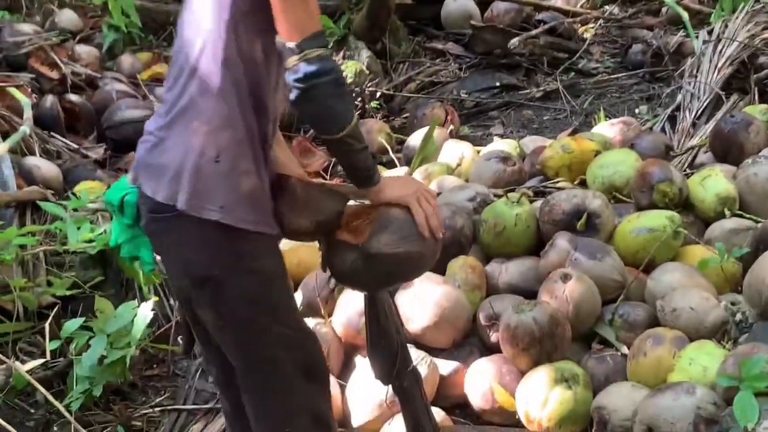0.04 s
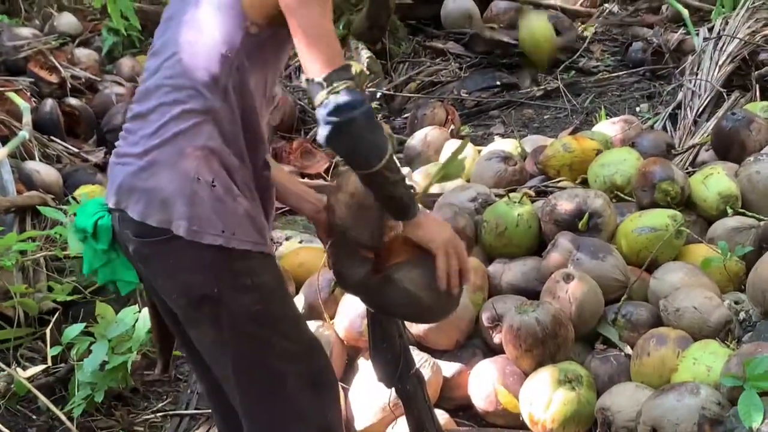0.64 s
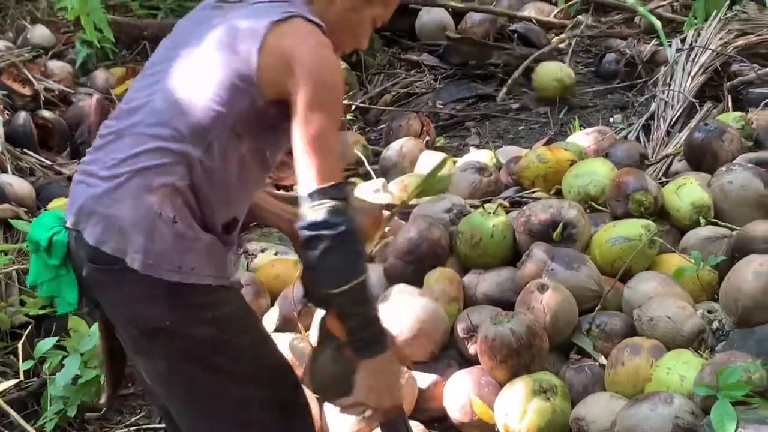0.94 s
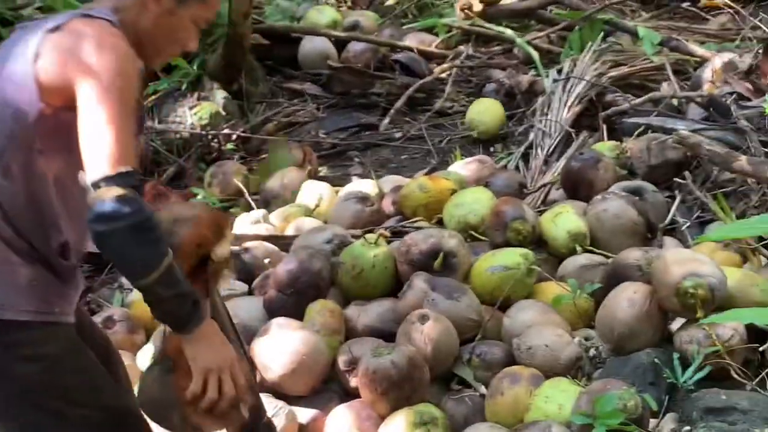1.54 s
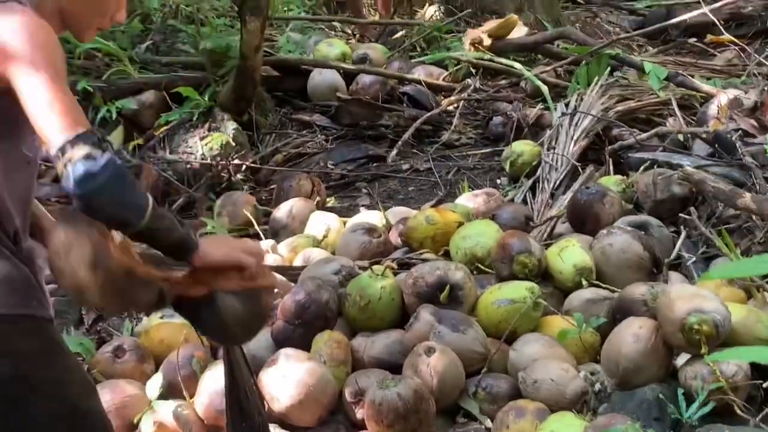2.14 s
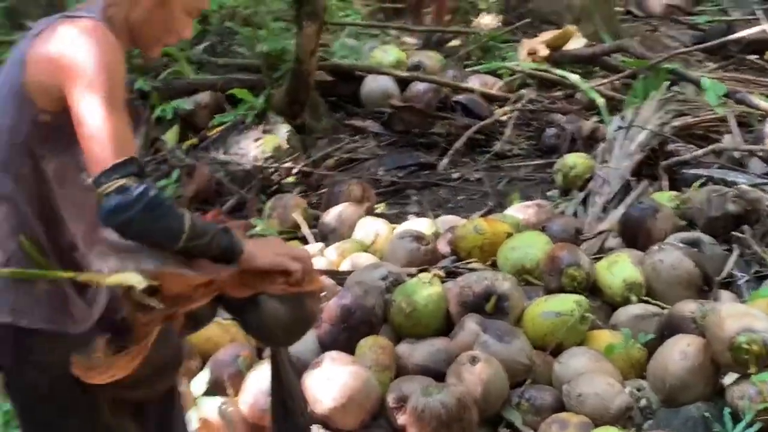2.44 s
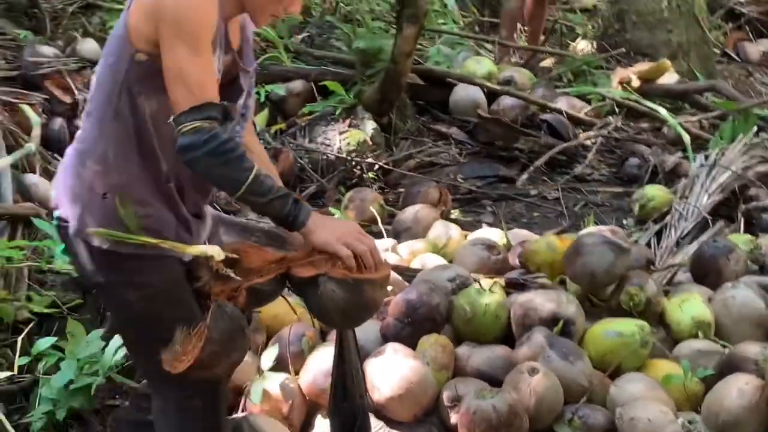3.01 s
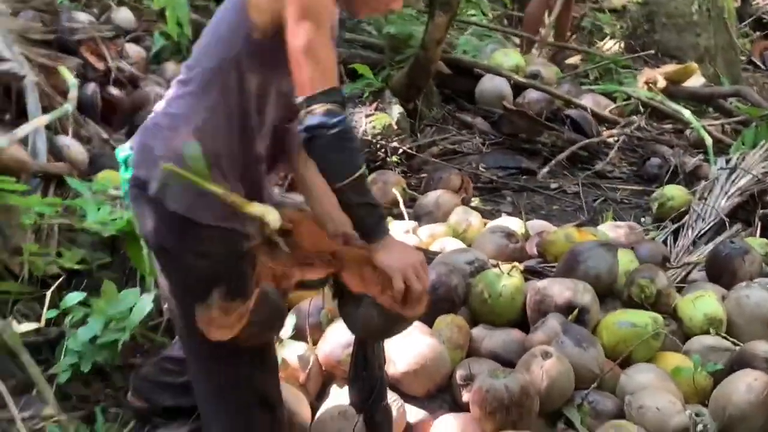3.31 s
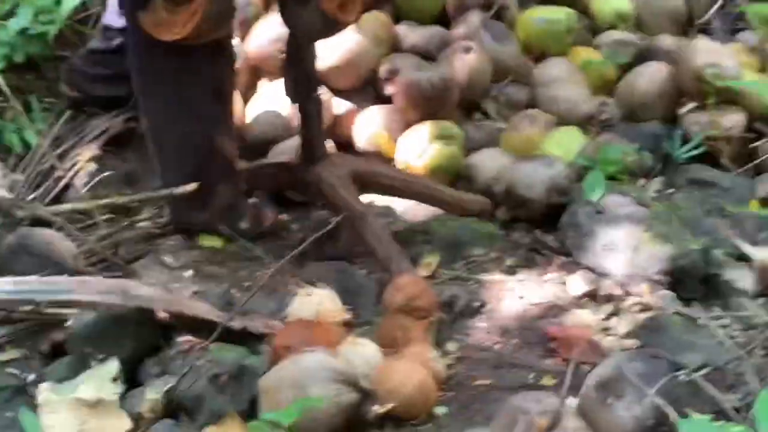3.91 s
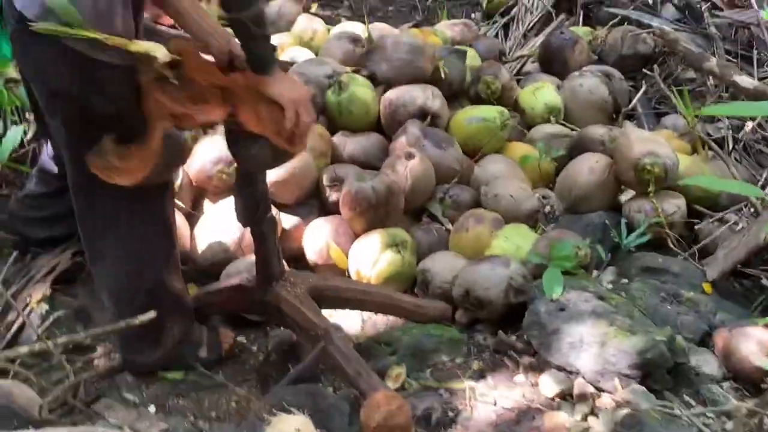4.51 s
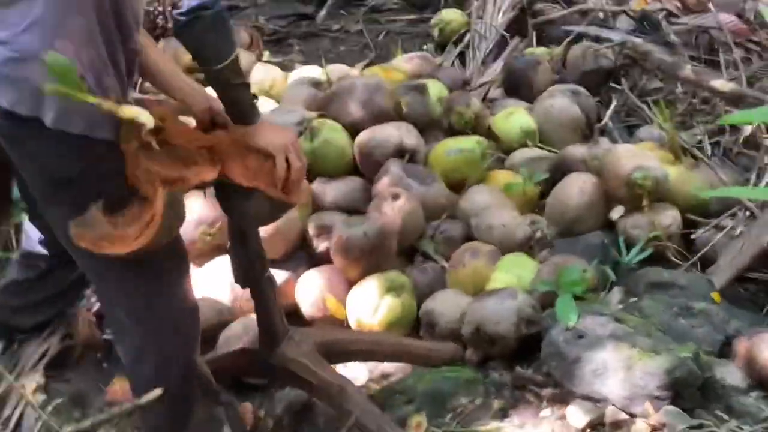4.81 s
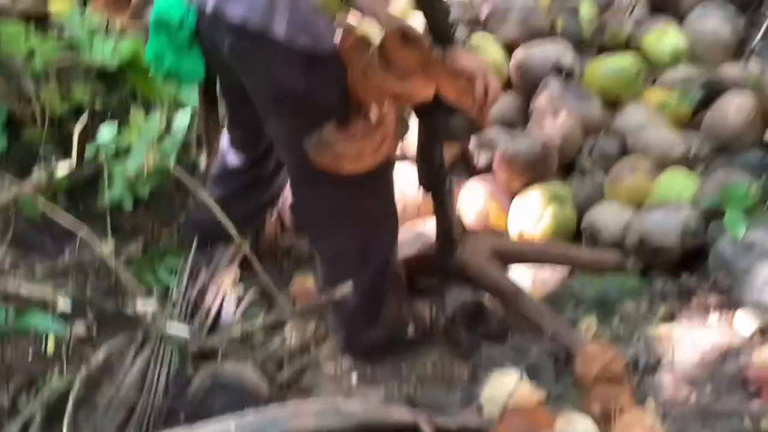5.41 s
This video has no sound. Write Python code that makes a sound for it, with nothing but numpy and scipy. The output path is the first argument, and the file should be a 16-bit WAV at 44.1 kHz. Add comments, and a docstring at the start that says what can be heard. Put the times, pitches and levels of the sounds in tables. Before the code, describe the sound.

A coconut is husked on an iron spike, close by, over faint, steady outdoor air. In the first second dry fibres rip and crackle in two main pulls, with a damp crunch and slight rubbing on the blade. Smaller tears follow, with a short hollow knock near 1.6 seconds and another near 2.5. At about 2.8 seconds the stiff skin splits with a sharp crack, leading into snapping fibres and a low judder, and tearing continues to about 3.4. The husk gives a brief ribbed creak on the spike around 3.6, followed by more crunching. A bright snap at 4.1 leads to a loud break at 4.3, with a knock and a thud into the soil. Small creaks come near 4.6 and 4.8. A last pull starts around 5.1 and ends in a quick run of crisp snaps by 5.5 seconds.

```python
"""Outdoors, a step or two from a worker husking coconuts on an iron spike. Each pull builds, holds and dies
away, tearing a swarm of dry fibres. Whole bundles snap, the skin cracks, the wet pith crunches on the blade,
the hollow nut knocks and croaks, and the weight goes down the stake into the soil. Worker, ground, heap and
trunks reflect the sound over quiet air."""
import sys
import numpy as np
from scipy import signal
from scipy.fft import rfft, irfft
from scipy.io import wavfile
from scipy.ndimage import uniform_filter1d, map_coordinates

SR = 44100
rng = np.random.default_rng(int(sys.argv[2]) if len(sys.argv) > 2 else 0)


def to_wav(sig):
    """Store sig (one row per channel, or 1-D mono) as 16-bit WAV at the path in sys.argv[1].

    Samples outside -1..1 are clipped; the rate is SR.
    """
    pcm = np.clip(np.atleast_2d(sig), -1, 1) * 32767
    pcm = np.round(pcm).astype(np.int16)
    wavfile.write(sys.argv[1], SR, pcm.T)  # frames by channels


N = 244755
T = np.arange(N) / SR
HIT_T = T[:SR // 4]  # time axis of one hit


def undb(db):
    """Decibels to gain."""
    return 10 ** (np.asarray(db) / 20)


def unit_rms(x):
    """Scale to rms 1."""
    return x / np.sqrt(np.mean(x ** 2))


def unit_hit(x):
    """Scale the loudest 4 ms to rms 1."""
    return x / np.sqrt(uniform_filter1d(x ** 2, 176).max())


def per_bin(points, column=1):
    """One column of a frequency table at every FFT bin."""
    table = np.array(points, float)
    return np.interp(np.log(np.arange(N // 2 + 1) * SR / N + 1), np.log(table[:, 0]), table[:, column])


def colour(x, spectrum):
    """Filter by a spectrum table; rms 1."""
    return unit_rms(irfft(rfft(x) * undb(per_bin(spectrum)), N))


def band(x, lo_hz, hi_hz):
    """Causal band-pass."""
    sos = signal.butter(2, [lo_hz, min(hi_hz, .45 * SR)], "band", fs=SR, output="sos")
    return signal.sosfilt(sos, x)


def fade(t60_s):
    """Exponential decay of a hit."""
    return np.exp(-np.log(1000) * HIT_T / t60_s)


def ring(hz, t60_s):
    """One damped mode."""
    return np.sin(2 * np.pi * hz * HIT_T) * fade(t60_s)


def drift(rate_hz):
    """Smooth random curve, spread near 1."""
    step = int(SR / rate_hz)
    return 0.98 * uniform_filter1d(np.repeat(rng.standard_normal(N // step + 1), step)[:N], step)


def add(out, t_s, x):
    """Mix x into out from t_s."""
    i = max(int(t_s * SR), 0)
    out[i:i + len(x)] += x[:N - i]


def ruptures(per_s, spread_db):
    """Tiny breaks at random times: many faint, a few strong."""
    size = undb(spread_db * np.minimum(rng.exponential(size=N), 4))
    return unit_rms((rng.random(N) < per_s / SR) * size * rng.choice([-1, 1], N))


# Outdoor air: f/Hz, relative level/dB
AIR_SPECTRUM = [(25, 16), (70, 9), (200, -9), (500, 0), (900, 2), (1600, -4), (4000, -12), (16000, -31)]


def air():
    """Quiet, steady outdoor noise."""
    return undb(-66.5) * colour(rng.standard_normal(N), AIR_SPECTRUM)


def with_reflections(x, db, lo_hz, hi_hz, t60_s, poses):
    """Direct sound plus a short echo cloud that changes with the worker's pose."""
    hop = N // poses + 1
    padded, window = np.pad(x, (hop, 2 * hop)), signal.windows.cosine(2 * hop)
    out = np.zeros(len(padded) + len(HIT_T))
    for i in np.arange(poses + 1) * hop:
        cloud = band(rng.standard_normal(len(HIT_T)) * fade(t60_s) * (HIT_T > .0003), lo_hz, hi_hz)
        echo = signal.fftconvolve(padded[i:i + 2 * hop] * window, cloud / np.linalg.norm(cloud))
        out[i:i + len(echo)] += echo
    return x + undb(db) * out[hop:hop + N]


# Weight landing on the soil: t/s, level/dB, f/Hz, t60/s
SOIL_THUDS = [(0.186, -44.5, 163, 0.038), (0.725, -46, 78.6, 0.11), (1.026, -58, 60.6, 0.3),
              (2.442, -50, 260, 0.025), (2.473, -41, 214, 0.027), (2.826, -42, 148, 0.035),
              (2.861, -33.5, 104, 0.024), (3.347, -45, 121, 0.038), (3.586, -47, 129, 0.11),
              (3.727, -39, 106, 0.03), (3.858, -40.5, 167, 0.018), (3.895, -45.5, 125, 0.062),
              (4.282, -33.5, 90, 0.1), (4.276, -28.5, 315, 0.033), (4.282, -27, 183, 0.026),
              (4.577, -45, 118, 0.04), (5.293, -51, 99, 0.071), (5.455, -49.5, 133, 0.12)]


def soil_thuds():
    """Weight goes down the stake: soft, low bumps through the ground."""
    out = np.zeros(N)
    for t_s, db, hz, t60_s in SOIL_THUDS:
        soil = band(rng.standard_normal(len(HIT_T)), 0.095 * hz, 1.4 * hz) * fade(t60_s)
        bump = ring(hz, t60_s) * (1 - np.exp(-HIT_T / 0.0063))
        add(out, t_s, undb(db) * unit_hit(unit_hit(bump) + .5 * unit_hit(soil)))
    return out


# Judder of nut and stake: f/Hz, relative level/dB
SHUDDER_SPECTRUM = [(20, -36), (45, -6.5), (75, -2), (110, -3.5), (190, -0.5), (290, -0.5), (400, -2.5),
                    (700, -29.5), (1500, -75)]


def shudder(db):
    """Nut and stake judder as the husk gives way."""
    jolts = ruptures(per_s=700, spread_db=3) * undb(2.5 * drift(35))
    return colour(jolts, SHUDDER_SPECTRUM) * undb(db)


# Husk dragged over the blade: t/s, length/s, level/dB, start f/Hz, end f/Hz
BLADE_RUBS = [(0.186, 0.042, -50, 475, 324), (0.632, 0.091, -46.5, 272, 173),
              (0.702, 0.069, -53.5, 123, 79), (1.286, 0.016, -41.5, 2010, 2090),
              (1.317, 0.12, -61.5, 709, 472), (2.128, 0.04, -55, 520, 370), (4.5, 0.088, -51.5, 739, 615),
              (4.537, 0.063, -55.5, 400, 287)]


def blade_rubs():
    """Uneven friction: a noise band whose pitch slides with the strain."""
    out = np.zeros(N)
    for t_s, length_s, db, start_hz, end_hz in BLADE_RUBS:
        progress = np.arange(0, length_s, 1 / SR) / length_s
        phase = 2 * np.pi * np.cumsum(start_hz + (end_hz - start_hz) * progress) / SR
        half_width_hz = min(.2 * start_hz, 190)
        lowpass = signal.butter(2, half_width_hz, fs=SR, output="sos")
        noise = signal.sosfilt(lowpass, rng.standard_normal((2, len(HIT_T))))[:, -len(progress):]
        friction = noise[0] * np.sin(phase) + noise[1] * np.cos(phase)
        grip = np.sin(np.pi * progress ** 0.34) ** 0.86
        add(out, t_s, undb(db) * unit_rms(grip * friction))
    return out


# Knocks on the hollow nut that repeat in the shell: t/s, knock level/dB, f/Hz, scrape level/dB
ECHOING_KNOCKS = [(3.562, -36.5, 1070, -41), (3.5716, -38, 1120, -42.5), (3.5795, -32, 1040, -43),
                  (3.61, -48, 1450, -60), (4.6108, -32, 1110, -64), (4.7825, -38, 1500, -63),
                  (4.7875, -33, 1350, -64)]


def echoing_knocks(laps=10, lap_s=0.004, lap_loss_db=4.5):
    """Separate knocks on the nut: each repeats every 4 ms in the hollow shell as a ribbed, pitched croak, with
    a brief bright scrape."""
    out = np.zeros(N)
    pulse = signal.unit_impulse(len(HIT_T))
    for t_s, db, hz, scrape_db in ECHOING_KNOCKS:
        knock = unit_hit(band(band(pulse, 0.61 * hz, 1.32 * hz), 0.66 * hz, 1.47 * hz))
        for lap in range(laps):
            add(out, t_s + lap * lap_s, undb(db - lap * lap_loss_db) * knock)
        scrape = band(rng.standard_normal(len(HIT_T)) * fade(0.014), 2100, 3400)
        add(out, t_s, undb(scrape_db) * unit_hit(scrape))
    return out


# Knocks of nut, husk and blade: t/s, level/dB, f/Hz, t60/s
NUT_KNOCKS = [(0.1188, -36.5, 1470, 0.0023), (1.583, -46, 920, 0.0086), (1.5871, -26, 1564, 0.0074),
              (1.589, -39, 410, 0.02), (1.6592, -36, 1600, 0.0048), (2.116, -44.5, 1500, 0.0086),
              (2.163, -40.5, 960, 0.022), (2.4731, -26.5, 1026, 0.012), (2.758, -17.5, 3160, 0.0034),
              (2.7602, -24.5, 2255, 0.0087), (2.784, -32, 1020, 0.011), (2.837, -32.5, 373, 0.018),
              (2.85, -32, 1007, 0.024), (2.9704, -38.5, 1150, 0.0025), (3.108, -41, 965, 0.0043),
              (3.7232, -33.5, 470, 0.013), (3.852, -32.5, 413, 0.01), (3.228, -39.5, 900, 0.016),
              (3.375, -41, 1060, 0.0035), (4.208, -54, 1300, 0.025), (4.257, -40.5, 1520, 0.03),
              (4.271, -26, 853, 0.041), (4.274, -29, 1030, 0.019), (4.357, -44, 450, 0.019),
              (4.797, -53, 1530, 0.075), (4.935, -49, 1370, 0.013), (5.288, -41.5, 490, 0.017)]


def nut_knocks():
    """The husk cushions and damps the hollow nut: a short tone, an overtone, a dull rattle."""
    out = np.zeros(N)
    cushion = (1 - np.exp(-HIT_T / 0.0021)) ** 2
    for t_s, db, hz, t60_s in NUT_KNOCKS:
        tone = (ring(hz, t60_s) + undb(-2.5) * ring(2.41 * hz, 0.37 * t60_s)) * cushion
        decay = fade(t60_s) + undb(-41) * fade(0.083)
        rattle = band(rng.standard_normal(len(HIT_T)) * cushion * decay, 0.5 * hz, 2 * hz)
        add(out, t_s, undb(db) * unit_hit(unit_hit(tone) + undb(-13) * unit_hit(rattle)))
    return out


# Splits of the stiff outer skin: t/s, level/dB, centre f/Hz
SKIN_CRACKS = [(0.1171, -41, 1500), (0.3334, -37, 650), (2.7568, -20.5, 2820), (2.7572, -27.5, 1350),
               (2.7602, -20.5, 2600), (2.9217, -43, 1500), (3.3414, -35.5, 1150), (3.7245, -51, 2220),
               (3.8524, -31.5, 1340), (3.858, -33, 1550), (3.871, -47, 1500), (3.892, -45, 1090),
               (4.1241, -23, 7450), (4.1258, -24.5, 5600), (4.544, -47, 1110), (4.564, -51, 1300),
               (5.3508, -30.5, 6900), (5.4485, -33, 1520)]


def skin_cracks():
    """The skin splits at once: one pulse, coloured by the woody shell."""
    out = np.zeros(N)
    pulse = signal.unit_impulse(len(HIT_T))
    for t_s, db, hz in SKIN_CRACKS:
        edges_hz = 0.65 * hz, 1.36 * hz
        click = band(band(pulse, *edges_hz), *edges_hz)
        add(out, t_s, undb(db) * unit_hit(click))
    return out


# Snapping fibre bundles: t/s, crack level/dB, woody body level/dB, bright edge level/dB, t60/s
BUNDLE_SNAPS = [(0.213, -37.5, -41.5, -40, 0.045), (.276, -36.5, -41.5, -37.5, 0.095),
                (0.3319, -28, -29, -28, 0.036), (.400, -38, -38.5, -29.5, 0.05),
                (0.634, -62, -32, -47, 0.026), (0.7733, -53, -38, -37, 0.011), (.7852, -54, -38, -42, 0.02),
                (0.8054, -37, -38.5, -30, 0.07), (0.8535, -37, -42, -34, .014),
                (.895, -44, -41.5, -40, .02), (.968, -73, -48, -56, 0.039), (1.338, -52, -54, -38, 0.012),
                (1.626, -45.5, -74, -45, 0.033), (1.688, -64, -52, -70, 0.0033),
                (1.782, -39, -45, -35.5, 0.039), (1.956, -65, -62, -50, .012),
                (2.067, -50.5, -54, -51, 0.016), (2.273, -62, -70, -45.5, .01),
                (2.366, -53, -46, -37.5, 0.027), (2.4739, -41, -44, -37, 0.01),
                (2.591, -64, -71, -54.5, 0.0058), (2.757, -53, -25, -24.5, 0.0052),
                (2.7992, -33, -60, -26, 0.022), (2.81, -39, -55, -26.5, 0.011),
                (2.832, -29, -30, -27.5, 0.047), (2.879, -38, -61, -36, 0.013),
                (2.894, -50, -56, -33.5, 0.017), (3.025, -57, -50, -43, 0.026),
                (3.06, -58, -69, -46.5, 0.016), (3.156, -42, -41, -31, 0.019),
                (3.188, -56, -47, -50, 0.036), (3.205, -49, -45, -50, 0.049), (3.227, -46, -46, -53, .025),
                (3.301, -53, -41.5, -50, 0.028), (3.3411, -36, -35, -27.5, 0.02),
                (3.5102, -36.5, -41, -36, 0.0036), (3.852, -51, -36, -39, 0.034),
                (4.117, -46, -50, -42, 0.006), (4.124, -25.5, -34, -21, 0.0084),
                (4.158, -50, -59, -31.5, 0.0037), (4.269, -24.5, -27.5, -28, 0.059),
                (4.2755, -25.5, -31, -31, 0.017), (4.749, -75, -56, -40, 0.0039),
                (4.7741, -45, -44, -35, 0.006), (4.802, -45.5, -43, -41, 0.038),
                (5.2839, -32.5, -37.5, -30.5, 0.022), (5.303, -26.5, -39, -25, 0.012),
                (5.315, -47, -56, -32, .008), (5.3506, -28.5, -35.5, -21.5, 0.01),
                (5.377, -45, -38.5, -51, 0.041), (5.399, -65, -62, -36, 0.008),
                (5.415, -39, -40.5, -37, 0.019), (5.4479, -32, -25.5, -25, 0.0095),
                (5.476, -48, -57, -39, 0.012)]


def bundle_snaps():
    """A bundle breaks in a brief rush; loose fibres around it rustle on."""
    out = np.zeros(N)
    for t_s, crack_db, body_db, edge_db, t60_s in BUNDLE_SNAPS:
        rush = rng.standard_normal(len(HIT_T)) * (fade(t60_s) + undb(-29) * fade(0.3))
        body = undb(body_db) * unit_hit(band(rush, 1190, 3600))
        crack = undb(crack_db) * unit_hit(band(rush, 2490, 6980))
        edge = undb(edge_db) * unit_hit(band(rush, 7700, 15600))
        add(out, t_s, body + crack + edge)
    return out


def splinters(count, lo_hz, hi_hz, spread_db, t60_s=.012):
    """Stiff strands flick free, each ringing briefly at its own pitch."""
    out, t, decay = np.zeros(N), HIT_T[:800], fade(t60_s)[:800]
    for when, pitch, chance in rng.random((count, 3)):
        size = undb(-spread_db * np.log(max(chance, .03)))
        hz = lo_hz * (hi_hz / lo_hz) ** pitch
        add(out, when * (N - 1) / SR, size * decay * np.sin(2 * np.pi * hz * t))
    return unit_rms(out)


# Crushed pith: f/Hz, relative level/dB
PITH_SPECTRUM = [(200, -20), (420, 6), (650, -4), (850, 0.5), (1100, 1.5), (1600, -4), (2400, -0.5),
                 (3200, -6), (5000, -7)]


def pith_crunch(db, spurts, pitch_wander=.06):
    """Damp, woody pith crunches; its pitch wanders as the grip shifts."""
    chips = .55 * splinters(count=2000, lo_hz=750, hi_hz=3400, spread_db=1)
    crunch = colour((ruptures(per_s=3500, spread_db=1.5) + chips) * spurts, PITH_SPECTRUM)
    read_index = np.cumsum(1 + pitch_wander * drift(14))
    return map_coordinates(crunch, [read_index], mode="mirror") * undb(db)


def swish(x, depth_db=2.2):
    """Half-octave bands swell and sink independently as the fibres turn."""
    log_centres = np.log(2) * np.arange(9, 14.6, .5)
    log_hz = np.log(np.arange(N // 2 + 1) * SR / N + 1)
    spectrum = rfft(x)
    out = np.zeros(N)
    for weights in np.eye(len(log_centres)):
        half_octave = irfft(spectrum * np.interp(log_hz, log_centres, weights), N)
        out += half_octave * undb(depth_db * drift(30))
    return unit_rms(out)


# Dry fibres, rustling or tearing: f/Hz, relative level/dB
FIBRE_SPECTRUM = [(500, -22), (1500, 2.5), (2500, 3.5), (3200, 2), (4200, 3), (5600, 1.5), (7500, 3.5),
                  (10000, 2.5), (13000, 4), (16000, -2.5)]


def fibre_rustle(db):
    """Loose fibres brush each other all over the husk."""
    return colour(rng.standard_normal(N), FIBRE_SPECTRUM) * undb(db)


def fibre_tearing(db, spurts):
    """Fibres part in spurts; each break flicks its neighbours."""
    flick_power = signal.oaconvolve(ruptures(per_s=1300, spread_db=4.7) ** 2, fade(0.0022) ** 2)[:N]
    ticks = unit_rms(np.sqrt(np.abs(flick_power)) * rng.standard_normal(N))
    strands = .6 * splinters(count=3000, lo_hz=2200, hi_hz=13000, spread_db=1.2)
    swarm = undb(2.5) * ruptures(per_s=20000, spread_db=1.4)
    return swish(colour((ticks + swarm + strands) * spurts, FIBRE_SPECTRUM)) * undb(db)


# Pulls on the husk: t/s, build/s, hold/s, fibre level/dB, pith level/dB, shudder level/dB, fall/(dB/s)
HUSK_PULLS = [(0.022, 0.095, 0.18, -45, -52.5, -59, 203), (0.285, 0.036, 0.073, -35.5, -46, -51.5, 311),
              (0.42, 0.033, 0.02, -64.5, -68, -75, 64), (0.623, 0.014, 0.0041, -37.5, -53, -56.5, 160),
              (0.668, 0.022, .005, -45, -48, -56, 249), (0.704, 0.082, 0.051, -38.5, -49.5, -62, 147),
              (0.904, 0.052, 0.033, -65.5, -72, -75, 93), (1.232, 0.046, 0.016, -43.5, -51.5, -63.5, 194),
              (1.298, 0.029, 0.033, -82, -56.5, -64.5, 59), (1.569, 0.014, 0.0042, -56, -50.5, -48, 196),
              (1.716, 0.023, 0.009, -48, -57.5, -60.5, 49), (2.091, 0.024, 0.047, -44.5, -52, -56.5, 233),
              (2.114, 0.14, 0.16, -56.5, -64.5, -65.5, 169), (2.45, 0.0072, .005, -67, -52.5, -47, 164),
              (2.525, 0.062, 0.063, -76, -65.5, -62.5, 102), (2.731, 0.048, 0.06, -41, -42.5, -42, 110),
              (2.957, .05, 0.17, -62, -62, -61, 94), (3.106, 0.079, 0.12, -44.5, -47, -52, 71),
              (3.499, 0.048, 0.27, -57, -59, -55.5, 165), (3.634, 0.047, 0.014, -49, -78, -70, 200),
              (3.764, 0.081, .01, -48, -53, -54, 105), (3.872, .12, 0.018, -49, -54.5, -58, 244),
              (4.101, 0.02, 0.0038, -43.5, -61, -62.5, 134), (4.249, 0.022, 0.0089, -46, -43.5, -48, 117),
              (4.43, 0.07, 0.08, -46.5, -50, -51.5, 161), (4.755, 0.02, 0.012, -53.5, -52, -58.5, 72),
              (4.858, 0.058, 0.19, -96, -70.5, -64.5, 58), (5.086, 0.041, 0.23, -47.5, -52, -64, 135),
              (5.437, 0.013, 0.0065, -42.5, -43.5, -44.5, 179)]


def pull_levels_db(swell_db=27.5, handling_db=-77):
    """Fibre, pith and shudder levels: each pull builds, holds while the husk gives, then dies away."""
    power = np.full((3, N), undb(handling_db) ** 2)  # hands shifting between pulls
    for t_s, build_s, hold_s, fibre_db, pith_db, shudder_db, fall_db_per_s in HUSK_PULLS:
        rise_db = swell_db * np.minimum((T - t_s) / build_s - 1, 0)
        fall_db = fall_db_per_s * np.maximum(T - t_s - build_s - hold_s, 0)
        envelope = undb(np.maximum(rise_db - fall_db, -100))
        power += np.outer(undb([fibre_db, pith_db, shudder_db]), envelope) ** 2
    return 10 * np.log10(power)


def scene():
    """Husk and nut close by; each of two channels has its own rustle, reflections and air."""
    fibre_db, pith_db, shudder_db = pull_levels_db()
    spurts = undb(1.3 * drift(210) + drift(50))
    tearing = fibre_tearing(fibre_db, spurts) + pith_crunch(pith_db, spurts)
    husk = undb(0.04) * tearing + blade_rubs() + bundle_snaps()
    nut = shudder(shudder_db) + nut_knocks() + skin_cracks() + echoing_knocks() + soil_thuds()
    channels = []
    for _ in range(2):
        # bounces off worker and ground
        bounced = with_reflections(husk, db=-7, lo_hz=740, hi_hz=15800, t60_s=.013, poses=64)
        near = bounced + fibre_rustle(fibre_db - 18) + nut
        # scatter from heap and trunks
        scattered = with_reflections(near, db=-12, lo_hz=367, hi_hz=5400, t60_s=0.088, poses=44)
        channels.append(scattered + air())
    return np.array(channels)


# Microphone pair: f/Hz, left phase lead/rad, left minus right level/dB
MIC_RESPONSE = [(30, 0, 0), (70, .3, 1), (110, .65, 1), (170, 1.45, 0), (235, 2.1, 0), (305, 3.1, 0),
                (360, 4.1, 0), (440, 5, 0), (540, 5.7, -2), (720, 6.9, -5), (1050, 7.1, -3),
                (2000, 5.8, -2.5), (3200, 7.6, -4.5), (4000, 6.7, -4), (5300, 7.8, -9), (6200, 6.1, -5),
                (7200, 5.2, -2), (8100, np.pi, 0), (8950, np.pi, 0), (10300, 0, 0), (11700, 0, 0),
                (12800, -np.pi, 0), (14100, -np.pi, 0), (15100, -2 * np.pi, 0)]


def record(dry, low_cut_hz=41, top_hz=16000):
    """Two microphones spread the sound by phase and level; deep bass and top are cut."""
    lead_rad, balance_db = per_bin(MIC_RESPONSE), per_bin(MIC_RESPONSE, column=2)
    gains = undb(np.array([balance_db, -balance_db]) / 2)
    gains /= np.sqrt(np.mean(gains ** 2, axis=0))
    wide = irfft(rfft(dry) * gains * np.exp(.5j * np.array([lead_rad, -lead_rad])), N)
    wide = signal.sosfilt(signal.butter(2, low_cut_hz, "high", fs=SR, output="sos"), wide)
    return signal.sosfilt(signal.ellip(8, .2, 70, top_hz, fs=SR, output="sos"), wide)


dry = scene()
out = record(dry)
to_wav(out)
```